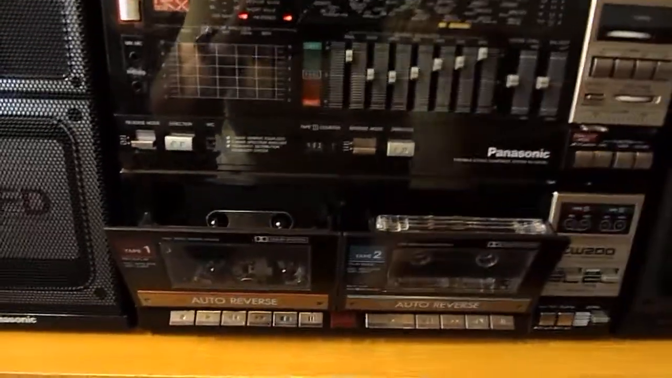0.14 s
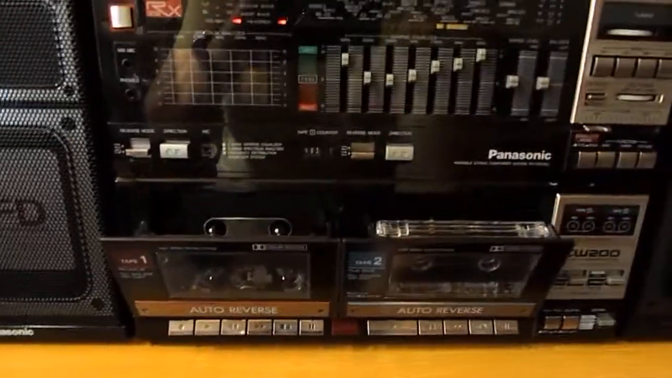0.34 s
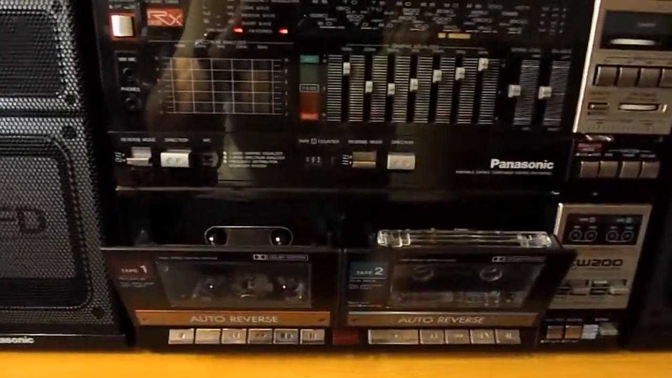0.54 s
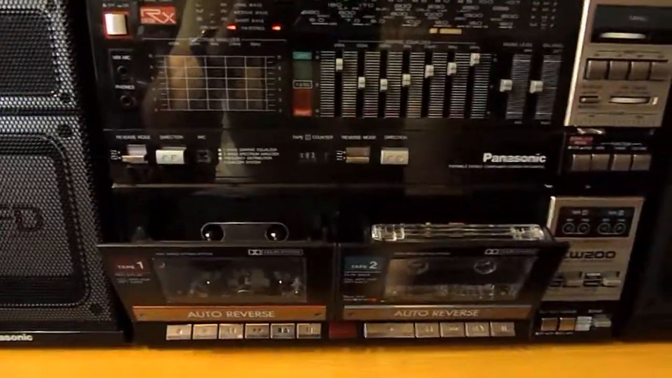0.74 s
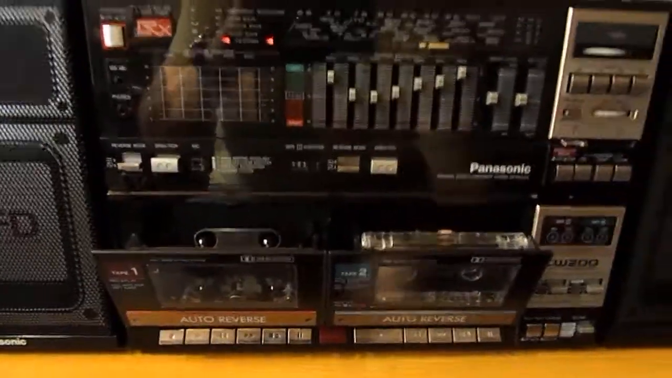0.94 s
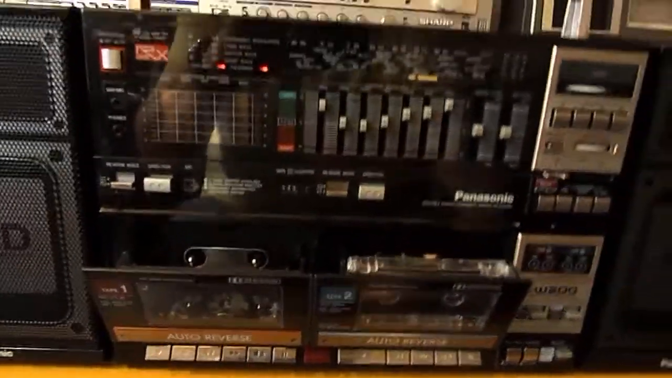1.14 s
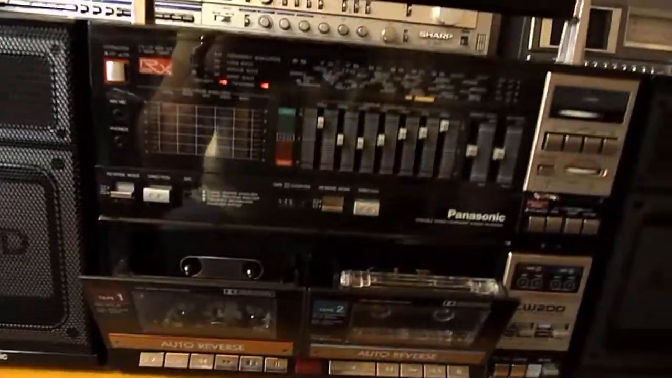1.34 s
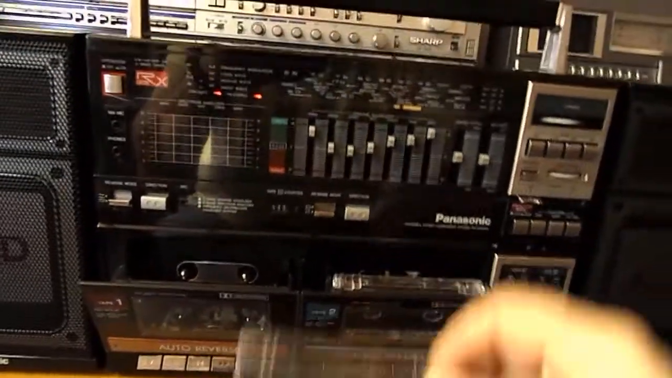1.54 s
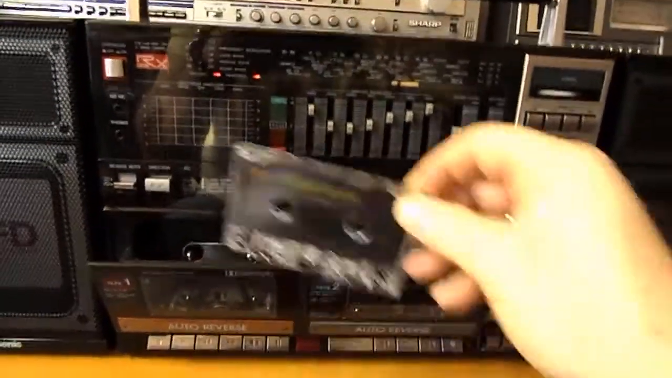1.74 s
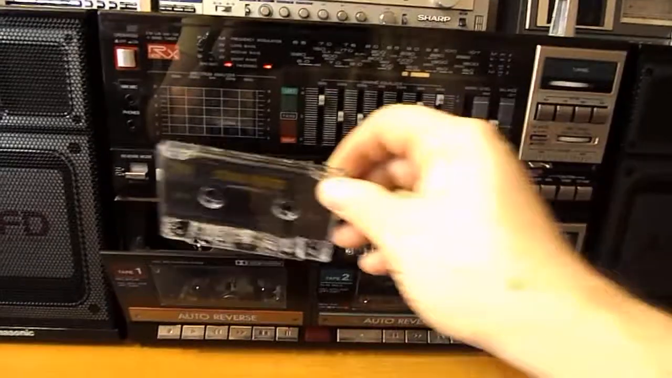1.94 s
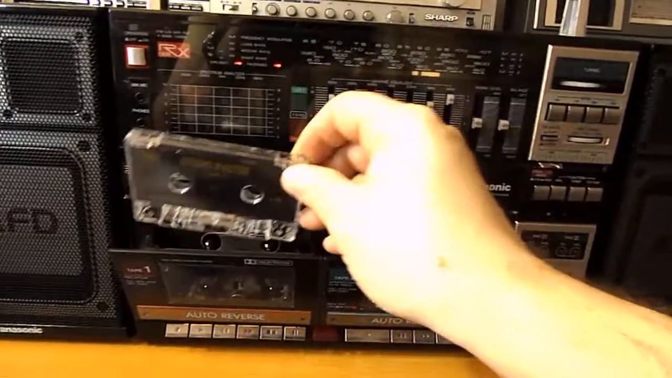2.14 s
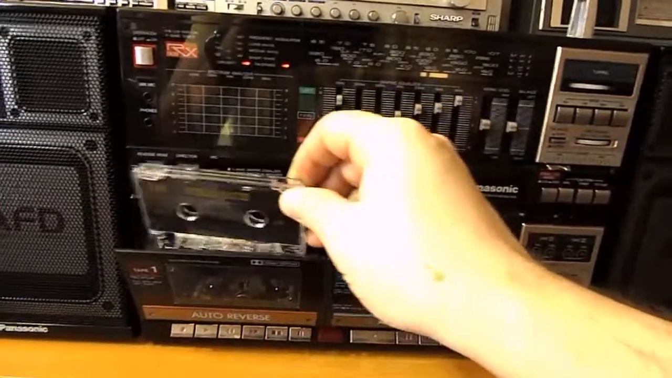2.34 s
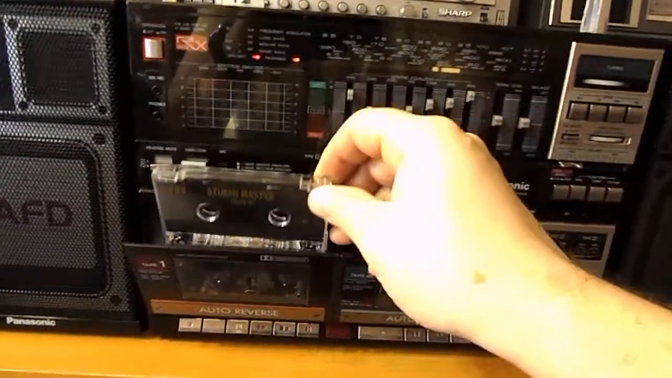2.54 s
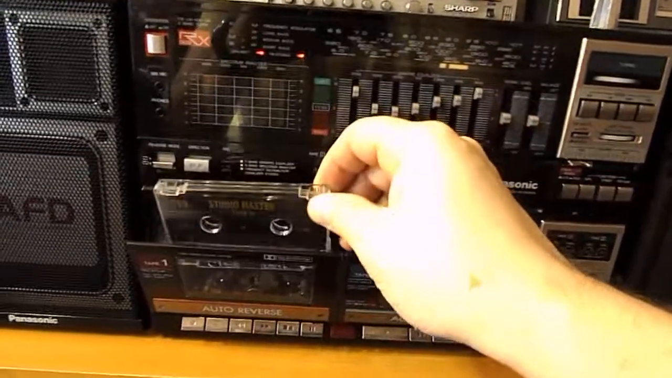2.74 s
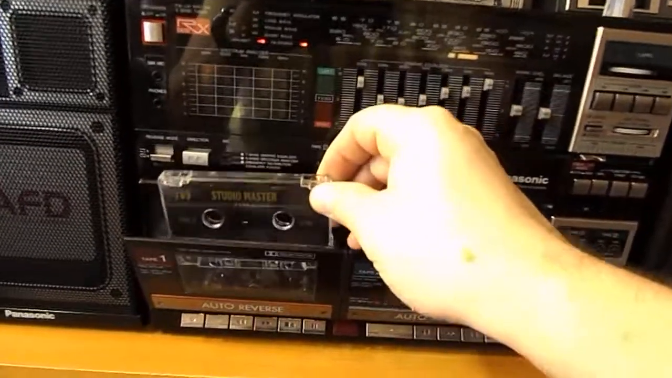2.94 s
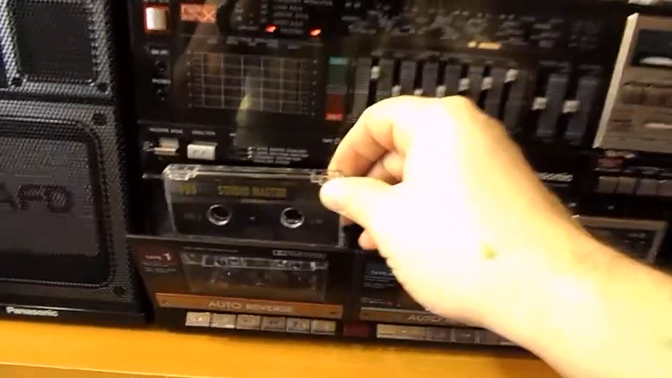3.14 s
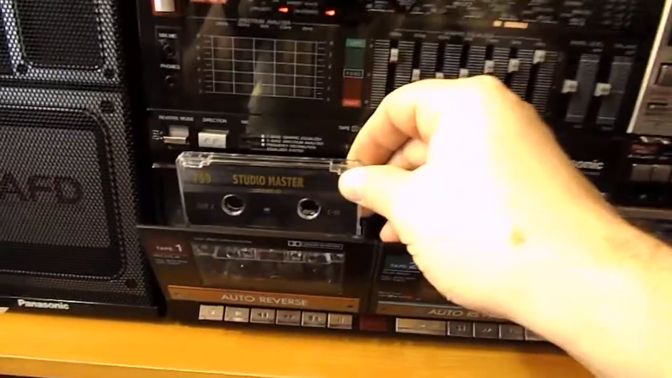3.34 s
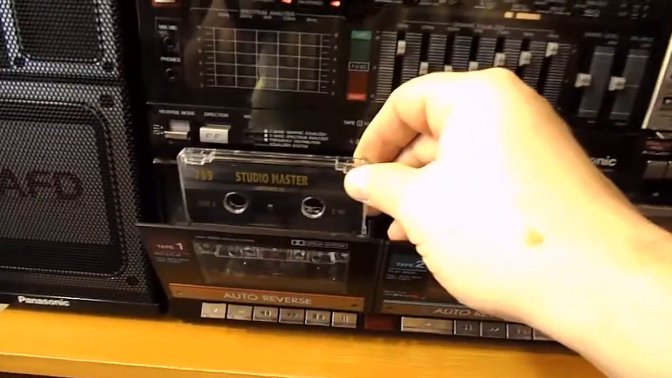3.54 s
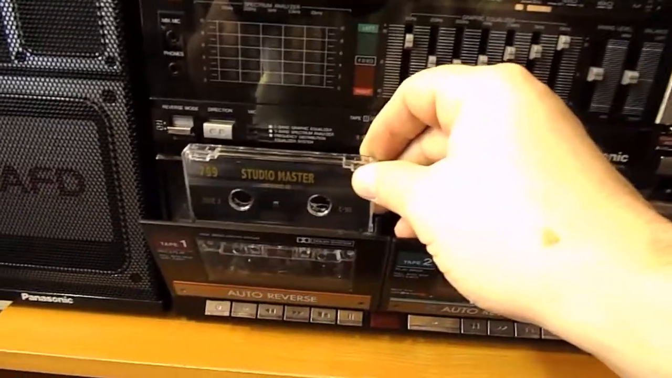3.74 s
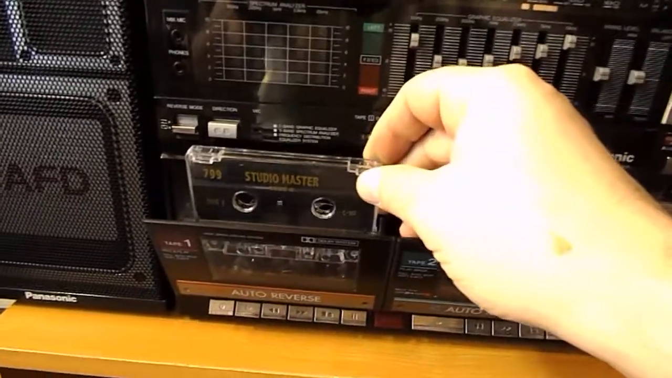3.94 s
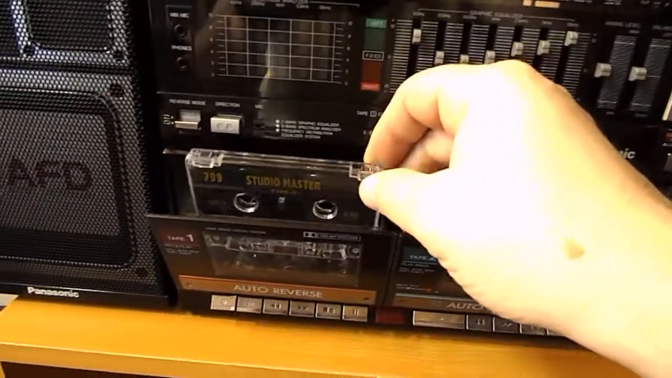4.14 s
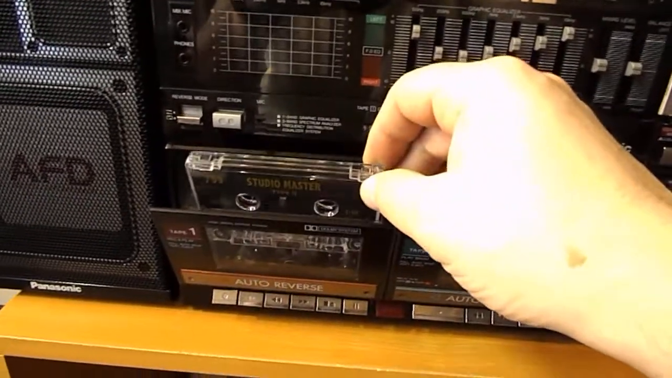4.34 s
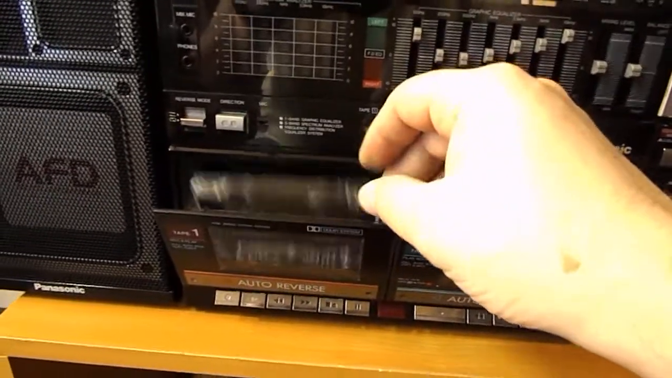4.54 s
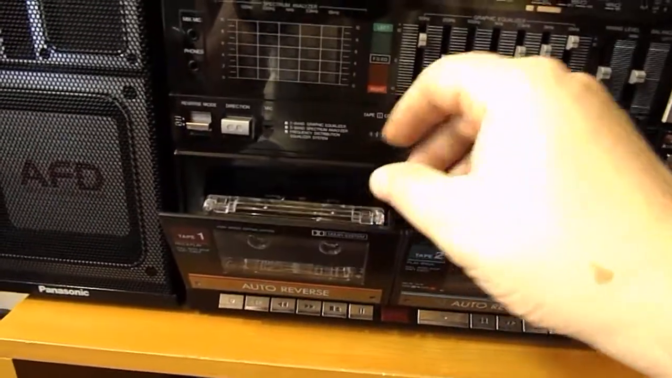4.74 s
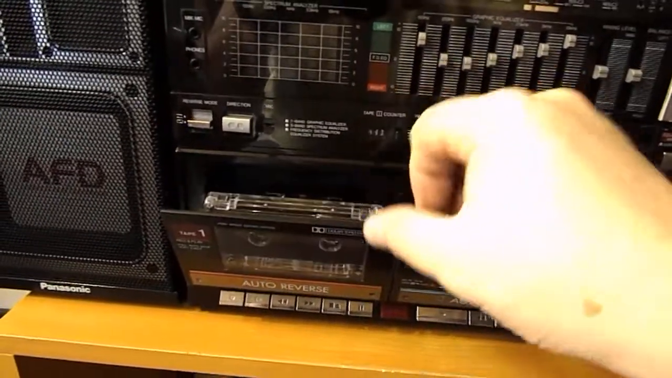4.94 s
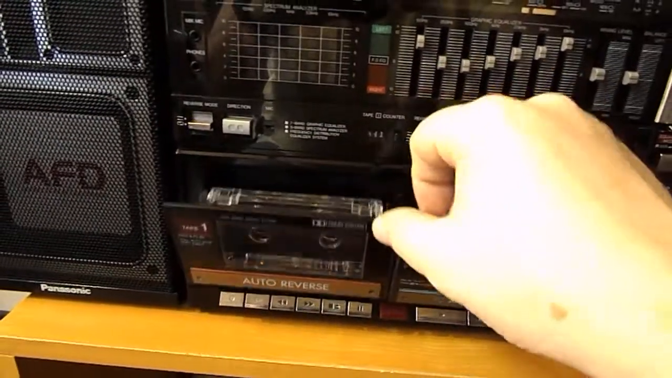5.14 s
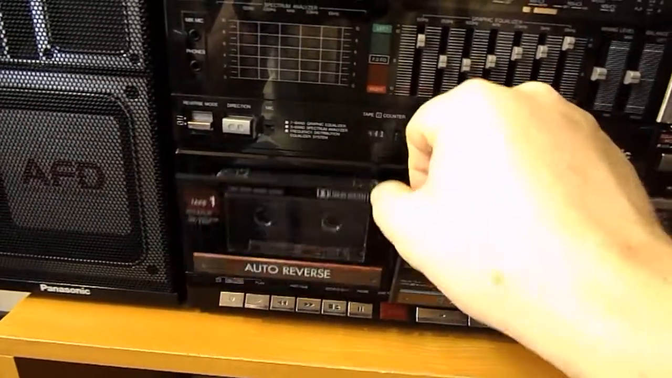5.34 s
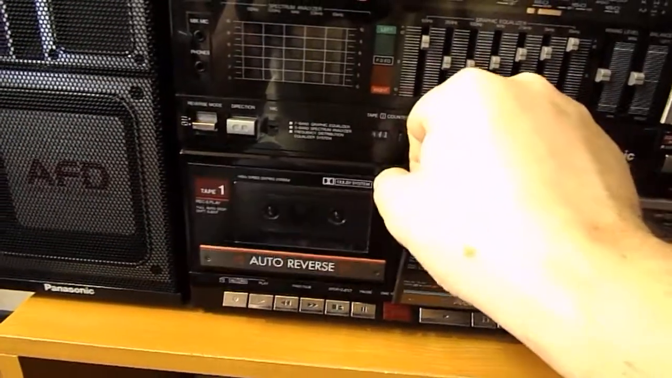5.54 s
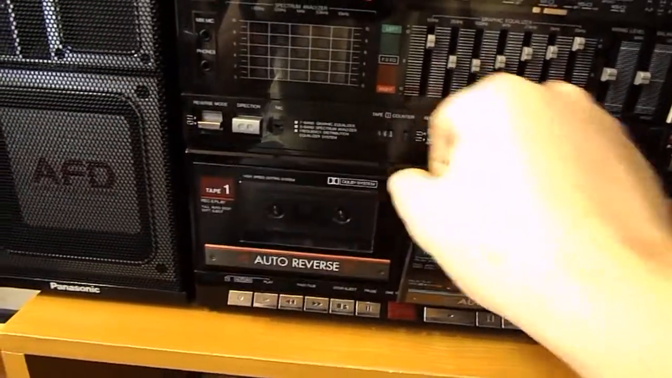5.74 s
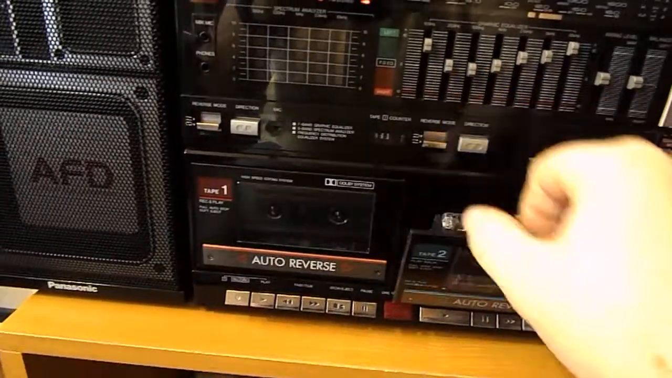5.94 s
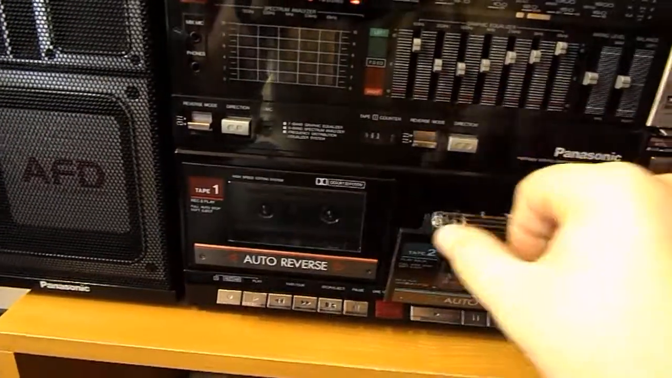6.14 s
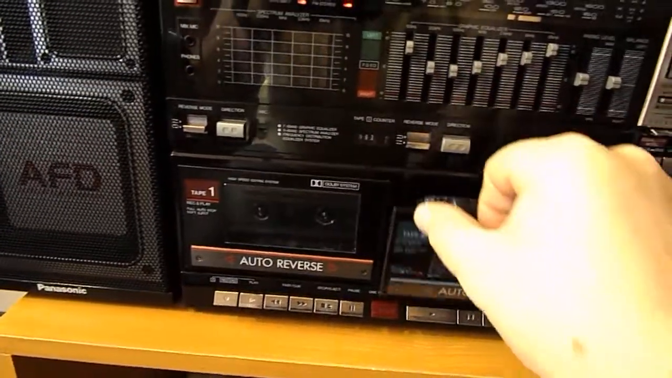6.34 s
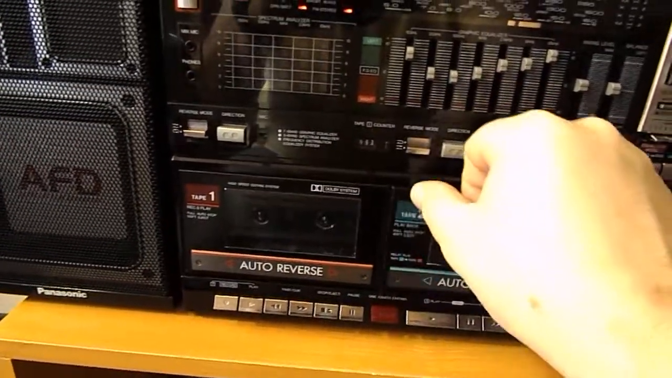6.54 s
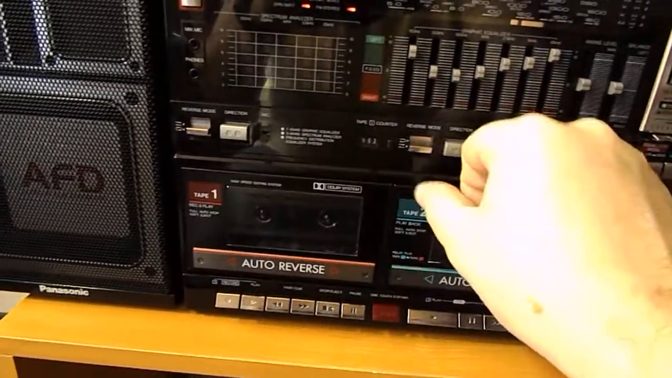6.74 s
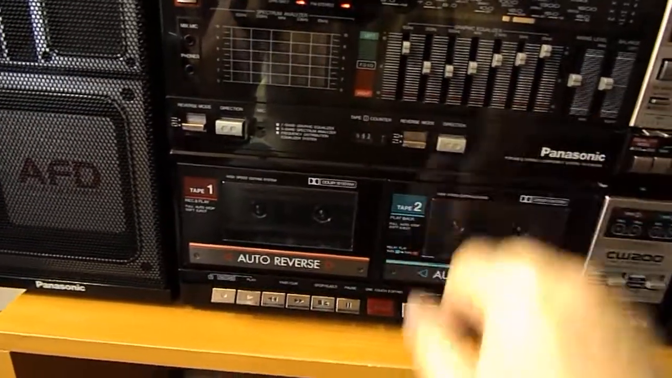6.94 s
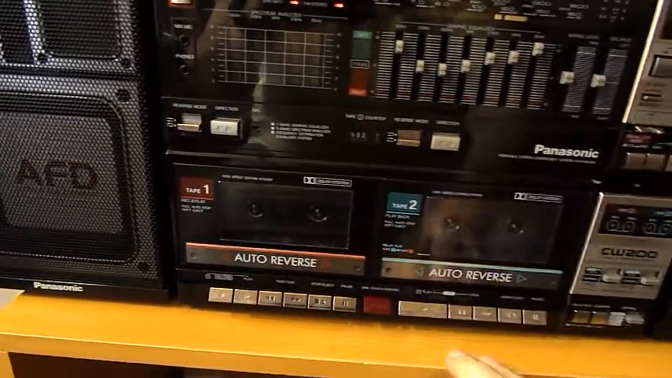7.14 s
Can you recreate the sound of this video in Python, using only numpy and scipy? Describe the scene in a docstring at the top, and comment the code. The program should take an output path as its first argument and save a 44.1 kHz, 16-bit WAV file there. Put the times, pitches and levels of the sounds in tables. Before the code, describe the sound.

Close to the microphone in a quiet small room, a twin cassette deck is being loaded. One crisp plastic click comes first, followed by a cluster of light knocks from the cassette shell. A few faint taps lead to a quick scrape and the loudest clack as the tape lands in its holder. Then one door and another snap shut with a slight cabinet thump, over soft hiss and hum.

```python
"""Loading a twin cassette deck

Close up in a small room, a cassette knocks against the open door of a portable stereo, scrapes down
its guides and drops home; the doors are pushed until their latches snap. Every blow rings plastic
panels and thumps the cabinet; the room answers over a faint hum and hiss."""
import sys
import numpy as np
from scipy import signal
from scipy.fft import rfft, irfft
from scipy.io import wavfile
from scipy.ndimage import uniform_filter1d, minimum_filter1d

SR = 44100
rng = np.random.default_rng(int(sys.argv[2]) if len(sys.argv) > 2 else 0)


def master(y):
    """Save y as 16-bit WAV."""
    cut = np.clip(np.atleast_2d(y).T, -1, 1)
    pcm = np.round(cut * 32767)  # scale
    wavfile.write(sys.argv[1], SR, pcm.astype(np.int16))


N = 316638
BLOW_SAMPLES = 16384


def undb(db):
    """Decibels to gain."""
    return 10 ** (np.asarray(db) / 20)


def unit_rms(x):
    """Scale to rms 1."""
    return x / np.sqrt(np.mean(x ** 2, axis=-1, keepdims=True))


def decay(t, t60_s):
    """Exponential decay, 60 dB down at t60_s."""
    return np.exp(-np.log(1000) * t / max(t60_s, 1e-3))


def bandpass(low_hz, high_hz, size, order=3):
    """Frequency response of a causal band-pass."""
    b, a = signal.butter(order, [low_hz, min(high_hz, .49 * SR)], "band", fs=SR)
    return rfft(b, size) / rfft(a, size)


def resonance(hz, width_hz, size=BLOW_SAMPLES):
    """Frequency response of one mode, gain 1 at its centre."""
    f = np.fft.rfftfreq(size, 1 / SR)
    return 1j * f * width_hz / (hz ** 2 - f ** 2 + 1j * f * width_hz)


def resonate(x, hz, width_hz):
    """Filter through a steep resonant band."""
    return irfft(rfft(x) * resonance(hz, width_hz, x.shape[-1]) ** 2, x.shape[-1])


def colour(x, points):
    """Shape a spectrum by (freq_hz, gain_db) points."""
    hz, db = np.transpose(points)
    f = np.fft.rfftfreq(x.shape[-1], 1 / SR)
    return irfft(rfft(x) * undb(np.interp(np.log(f + 1), np.log(hz), db)), x.shape[-1])


def stereo_noise(size, spread):
    """Two noises; spread is the share of power they do not have in common."""
    left, other = rng.standard_normal((2, size))
    return np.array([left, np.sqrt(1 - spread) * left + np.sqrt(spread) * other])


def add(out, start_s, sound):
    """Mix a sound in at start_s."""
    i = int(start_s * SR)
    out[:, i:i + sound.shape[-1]] += sound[..., :N - i]


# freq_hz, gain_db
AIR_SPECTRUM = [(18, -67), (30, -48), (75, -44), (152, -22), (292, -6), (379, -10.5), (479, -3),
                (561, -11.5), (1050, -12), (1140, -11.5), (1260, -12), (1360, -12.5), (1510, -15.5),
                (2910, -17.5), (15500, -25.5)]
# pitch_hz, level_db
HUM_TONES = [(489.9, -68.5), (1061, -74)]

def background(air_db=-57.5, whine_hz=11450, whine_db=-77, pan_db=1.22):
    """Soft room noise and hiss, with a wavering hum and a thin steady whine."""
    mid, side, hiss = rng.standard_normal((3, N))
    hiss = irfft(rfft(hiss) * bandpass(900, SR / 2, N, order=1), N)
    side = undb(-8) * side + undb(-2) * hiss
    mid, side = colour(np.array([mid, side]), AIR_SPECTRUM)
    air = np.array([mid + side, mid - side]) / np.std(mid) * undb(air_db)
    hum = sum(undb(db) * unit_rms(resonate(rng.standard_normal(N), hz, width_hz=5))
              for hz, db in HUM_TONES)
    whine = undb(whine_db) * unit_rms(np.sin(2 * np.pi * whine_hz * np.arange(N) / SR))
    return (air + hum + whine) * undb([[pan_db], [-pan_db]])


def friction(size, slips_per_s=2200, scatter_db=4, slip_s=0.0025):
    """Dense tiny slips of uneven strength, each a decaying burst of noise."""
    slips = (rng.random(size) < slips_per_s / SR) * undb(scatter_db * rng.standard_normal(size))
    envelope = signal.lfilter([1], [1, -np.exp(-1 / (slip_s * SR))], slips)
    return unit_rms(stereo_noise(size, spread=1) * envelope)


# start_s, length_s, level_db, centre_hz, width_hz
LIGHT_RUBS = [(0.32, 0.25, -56, 4230, 5170), (0.849, 0.16, -57.5, 4400, 400),
              (1.028, 0.1, -51.5, 4420, 450), (1.027, 0.077, -49.5, 690, 1410),
              (2.483, 0.11, -38, 1610, 4500), (2.991, 0.13, -56.5, 4370, 4500),
              (5.182, 0.21, -58, 7340, 1700), (5.272, 0.11, -51.5, 1520, 2940),
              (6.434, 0.044, -50.5, 3480, 5000)]

def rubs():
    """Fingers and door hinges rub lightly."""
    out = np.zeros((2, N))
    for start_s, length_s, level_db, centre_hz, width_hz in LIGHT_RUBS:
        size = int(length_s * SR)
        rub = unit_rms(resonate(friction(size), centre_hz, width_hz))
        add(out, start_s, rub * signal.windows.tukey(size) * undb(level_db))
    return out


# freq_hz, gain_db
SLIDE_SPECTRUM = [(100, -26.5), (300, -15), (700, 1.5), (1100, -13), (1400, 6.5), (1850, 4), (2500, -6),
                  (3500, 4), (5000, 0), (7500, 0.5), (9500, -7.5), (11200, -9), (15000, -7.5)]

def cassette_slide(start_s=4.5165, start_db=-50.5, swell_db_per_s=178):
    """The cassette gathers speed down its guides, so the scrape swells until it lands."""
    t = np.arange(N) / SR
    landing_s = CORNER_HITS[0][0]
    sliding = (t > start_s) & (t < landing_s)
    swell = sliding * undb(start_db + swell_db_per_s * (t - start_s) * sliding)
    scrape = colour(friction(N, slips_per_s=1100, scatter_db=5), SLIDE_SPECTRUM)
    return unit_rms(scrape) * swell


# Rows of both tables: thump, clack, snap, tick.
# low_hz, high_hz, ring_ratio, right_db, spread
BLOW_BANDS = [(290, 1010, 2.1, 1.5, 0.04), (724, 3050, 0.91, -6, 0.47), (2480, 7550, 0.74, -16, .55),
              (6650, 14660, 0.75, -7.5, 0.93)]
# early_db, late_db, late_t60_s, spread
ROOM_BANDS = [(-14.5, -13, 0.39, 0.11), (-12, -27, 0.42, 0.98), (-19, -32.5, 0.36, 1),
              (-18, -26.5, 0.23, 1)]

def blow(responses, parts, levels_db, ring_s, room_db, early_t60_s=0.077, room_right_db=-3.5):
    """One contact: the panels ring briefly, shelf and cabinet reflect it, the room dies away."""
    t = np.arange(BLOW_SAMPLES) / SR
    attack = t < .014
    out = 0
    for level_db, response, band, room in zip(levels_db, responses, BLOW_BANDS, ROOM_BANDS):
        _, _, ring_ratio, right_db, spread = band
        early_db, late_db, late_t60_s, room_spread = room
        ring = decay(t, ring_s * ring_ratio) * (1 - np.exp(-t / 0.00005))
        early = undb(early_db) * decay(t, early_t60_s) * (1 - np.exp(-t / 0.0095))
        late = undb(late_db) * decay(t, late_t60_s) * (1 - np.exp(-t / 0.01))
        tail = np.hypot(early, late)
        direct = irfft(rfft(stereo_noise(BLOW_SAMPLES, spread) * ring) * response * parts)
        # the room hears the whole cabinet, so the struck parts stand out half as much
        echoes = irfft(rfft(stereo_noise(BLOW_SAMPLES, room_spread) * tail) * response * np.sqrt(parts))
        direct = unit_rms(direct) * np.linalg.norm(ring) * undb([[0], [right_db]])
        echoes = unit_rms(echoes) * np.linalg.norm(tail) * undb([[0], [room_right_db]])
        sound = direct + echoes * undb(room_db)
        out = out + sound * undb(level_db) / np.std(sound[0, attack])
    return out


def band_levels(level_db, tilt_db_per_oct, part_hz, arch_db, pivot_hz=2450):
    """Harder contacts tilt to the treble; bands near the part's pitch rise; thump and tick drop."""
    centres_hz = np.array([np.sqrt(low * high) for low, high, *_ in BLOW_BANDS])
    tilt_db = tilt_db_per_oct * np.log2(centres_hz / pivot_hz)
    lift_db = 3 * np.exp(-(np.log2(centres_hz / part_hz) / 0.55) ** 2)
    return level_db + tilt_db + lift_db - arch_db * np.array([1, 0, 0, 1])


def strike(hits, modes, part_db, panel_db, q, bass_db, arch_db=12):
    """Blows on one object: its modes colour all; the struck part and the panel behind add pitches."""
    body = 1 + sum((undb(db) - 1) * resonance(hz, width_hz) for hz, width_hz, db in modes)
    bands = [bandpass(low, high, BLOW_SAMPLES) for low, high, *_ in BLOW_BANDS]
    # a thump shoves the whole cabinet a little
    bands[0] += undb(bass_db) * bandpass(40, 270, BLOW_SAMPLES, order=1)
    responses = np.array(bands) * body
    out = np.zeros((2, N))
    for start_s, level_db, tilt, part_hz, panel_hz, ring_s, room_db in hits:
        panel = (undb(panel_db) - 1) * resonance(panel_hz, panel_hz / q)
        clarity_db = 1.5 * np.log2(ring_s / 0.035)  # longer ring, clearer pitch
        part = (undb(part_db + clarity_db) - 1) * resonance(part_hz, part_hz / q)
        levels_db = band_levels(level_db, tilt, part_hz, arch_db)
        add(out, start_s, blow(responses, 1 + panel + part, levels_db, ring_s, room_db))
    return out


# pitch_hz, width_hz, gain_db
DOOR_RESONANCES = [(309, 14, 8), (443, 70, 3.5), (578, 41, -5.5), (734, 100, 5), (953, 120, -2.5),
                   (1270, 68, 5), (1750, 210, 5.5), (1824, 190, 1), (2016, 90, -2), (2328, 160, 6),
                   (3610, 510, 3.5), (4670, 600, 1.5), (10040, 110, 6.5)]
# start_s, level_db, tilt_db_per_oct, part_hz, panel_hz, ring_s, room_db
NUDGE_HITS = [(0.5538, -34.5, 1.5, 1980, 570, 0.02, 19), (0.5585, -42, -3.5, 1630, 570, 0.018, -3),
              (0.823, -39.5, -3, 3550, 796, 0.026, 9), (0.834, -41.5, 4.5, 4600, 770, 0.059, 12),
              (5.16, -49.5, 1.5, 4240, 500, 0.014, 19.5), (5.296, -54.5, -5, 1750, 800, 0.025, 2),
              (5.335, -55, -4, 1750, 800, 0.025, 4), (5.386, -33.5, 0, 1530, 680, 0.041, 7.5),
              (5.464, -36, 0.5, 4330, 680, 0.22, 0), (5.478, -30, -1.5, 4360, 725, 0.03, 4),
              (5.501, -40.5, 0, 2100, 1110, 0.033, 11), (5.587, -48.5, 12.5, 10000, 1100, 0.027, 7),
              (5.957, -52.5, -1.5, 6500, 465, 0.18, -1), (6.147, -58, 4, 6600, 407, 0.017, 8),
              (6.171, -56, 4.5, 6500, 470, 0.02, 14), (6.478, -40, 4.5, 6300, 490, 0.034, 9.5),
              (6.5465, -37.5, -2.5, 1860, 720, 0.029, 16), (6.562, -30.5, 0.7, 6900, 290, 0.047, 16.5),
              (6.567, -27.5, 1, 2350, 290, 0.044, 1)]

def door_nudges():
    """Fingers nudge the plastic doors and holders."""
    return strike(NUDGE_HITS, DOOR_RESONANCES, part_db=16, panel_db=9.5, q=11, bass_db=-38)


# pitch_hz, width_hz, gain_db
SHELL_RESONANCES = [(452, 20, 3.7), (983, 110, 2.7), (1406, 82, 0.84), (1582, 300, 5.6), (2050, 410, 5.3),
                    (3320, 220, 4.5), (4050, 310, 6.3), (4790, 350, 3.5), (7150, 180, 1.8), (11460, 90, 11),
                    (14800, 300, 5.2)]
# start_s, level_db, tilt_db_per_oct, part_hz, panel_hz, ring_s, room_db
SHELL_HITS = [(0.294, -63, -12, 1680, 800, 0.048, 8), (1.7287, -30.5, 2, 4460, 774, 0.018, -6),
              (1.7693, -46.5, -2, 3100, 1350, 0.015, -18), (2.02, -31.5, -3, 4670, 1370, 0.048, 5.5),
              (2.028, -39, 3, 4770, 790, 0.087, -2), (2.047, -37.5, -4, 4900, 1010, 0.09, 0),
              (2.057, -51.5, 10, 4800, 940, 0.073, -7), (2.293, -33.5, -1.5, 2900, 1230, 0.061, 2),
              (2.306, -24, 0.5, 3070, 1245, 0.03, 9), (2.3115, -30.5, 5, 12100, 1220, 0.053, 3),
              (2.4345, -32.5, -0.3, 940, 1860, 0.032, 10.5), (2.514, -36, -1.2, 2180, 706, 0.084, 6),
              (2.549, -21.5, 1.5, 845, 1590, 0.059, 9.5), (2.5997, -21, 3.5, 5200, 634, 0.033, 6),
              (2.6695, -25.5, 2, 3360, 675, 0.029, 5), (2.758, -47.5, -2, 3600, 486, 0.045, 6),
              (2.921, -37, 1, 7400, 645, 0.045, 9.5), (3.053, -53, -2, 4400, 640, 0.041, 23),
              (3.139, -49.5, 2, 5700, 1000, 0.053, 3), (3.369, -47, -3.5, 1820, 630, 0.042, 4),
              (4.058, -51.5, -3, 1690, 450, 0.067, 4), (4.6125, -42, 9, 11100, 686, 0.1, 3),
              (4.7195, -33.5, 4, 9100, 1360, 0.0053, -7)]

def cassette_knocks():
    """The cassette shell knocks in the hand and against the door."""
    return strike(SHELL_HITS, SHELL_RESONANCES, part_db=9, panel_db=11.5, q=15, bass_db=-31)


# start_s, level_db, tilt_db_per_oct, part_hz, ring_s, room_db
CORNER_HITS = [(4.6428, -10, 1.5, 4800, 0.03, -0.5), (4.6446, -16, 11.5, 5780, 0.066, 3),
               (4.654, -8.5, -1.5, 1754, 0.049, 3), (4.6595, -21, 7, 14150, 0.08, 4.5),
               (4.662, -18, -2, 1584, 0.09, 11)]

def cassette_landing(panel_hz=570):
    """The cassette strikes the hollow holder, corner by corner."""
    hits = [(start_s, level_db, tilt, part_hz, panel_hz, ring_s, room_db)
            for start_s, level_db, tilt, part_hz, ring_s, room_db in CORNER_HITS]
    return strike(hits, DOOR_RESONANCES, part_db=11, panel_db=12, q=9, bass_db=-25.5, arch_db=17)


# start_s, level_db, tilt_db_per_oct, hook_hz, door_hz, panel_hz, ring_s, rebound_db, settle_after_s
LATCHES = [(0.638, -17.5, 1.5, 3830, 3520, 428, 0.034, -24, 0.12),
           (5.594, -17.5, 0.4, 4580, 1750, 1090, 0.09, -0.5, 0.154),
           (6.63, -17, -0.3, 4360, 2000, 1190, 0.095, 0.5, 0.158)]

def latch_snaps():
    """The hook lets go; the door meets its frame, rebounds and settles with a soft knock."""
    out = np.zeros((2, N))
    for start_s, level_db, tilt, hook_hz, door_hz, panel_hz, ring_s, rebound_db, after_s in LATCHES:
        # start_s, level_db, tilt_db_per_oct, part_hz, panel_hz, ring_s, room_db
        hook = (start_s, level_db, tilt + 3.5, hook_hz, panel_hz, 0.024, 5.5)
        frame = (start_s + 0.0025, level_db + 0.5, tilt - 0.5, door_hz, panel_hz, ring_s, 4.5)
        rebound = (start_s + 0.0157, level_db + rebound_db, tilt + 4.4, hook_hz, panel_hz, 0.018, 5.5)
        settle = (start_s + after_s, level_db - 30, -4.5, door_hz, 594, 0.061, 0)
        for hit, arch_db in (hook, 14), (frame, 12), (rebound, 14), (settle, 14):
            out += strike([hit], DOOR_RESONANCES, part_db=14.5, panel_db=8, q=11,
                          bass_db=-29, arch_db=arch_db)
    return out


def scene(rubbing_right_db=-7):
    """Impacts and rubbing over the quiet room."""
    impacts = latch_snaps() + cassette_landing() + door_nudges() + cassette_knocks()
    rubbing = (cassette_slide() + rubs()) * undb([[0], [rubbing_right_db]])
    return impacts + rubbing + background()


def record(dry, window_samples=41, cutoff_hz=16200):
    """A fast limiter holds the hardest peaks at full scale; a low-pass cuts the top."""
    gain = 1 / np.maximum(np.abs(dry), 1)
    gain = uniform_filter1d(minimum_filter1d(gain, window_samples), window_samples)
    lowpass = signal.ellip(8, .2, 60, cutoff_hz, fs=SR, output="sos")
    return signal.sosfilt(lowpass, dry * gain)


dry = scene()
out = record(dry)
master(out)
```